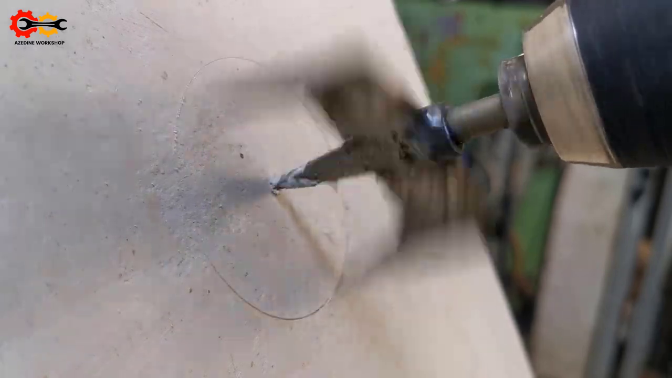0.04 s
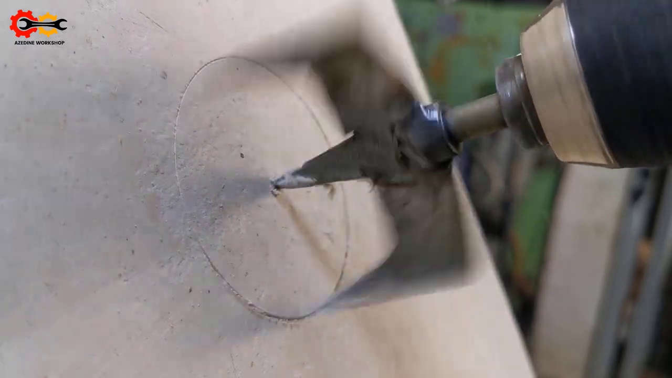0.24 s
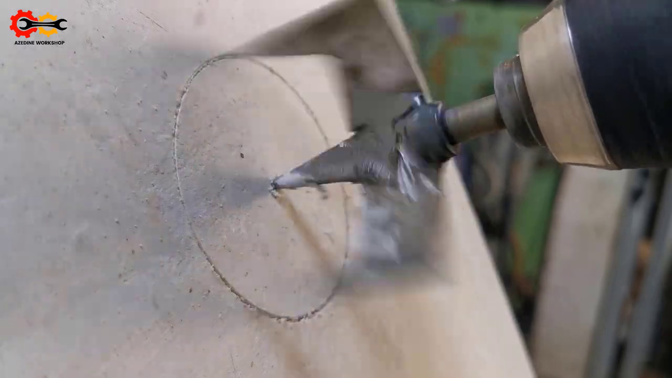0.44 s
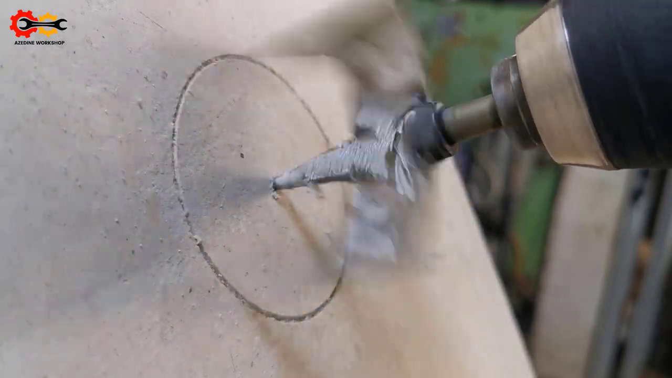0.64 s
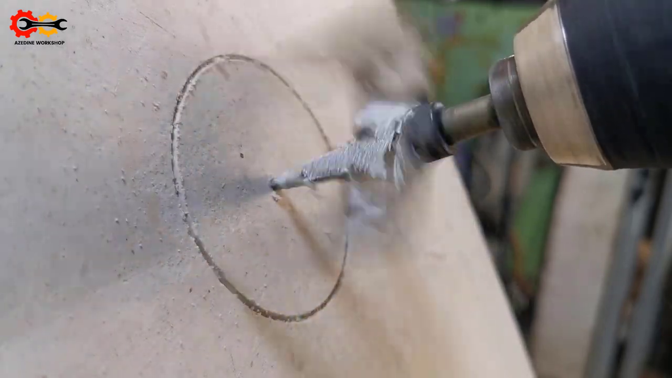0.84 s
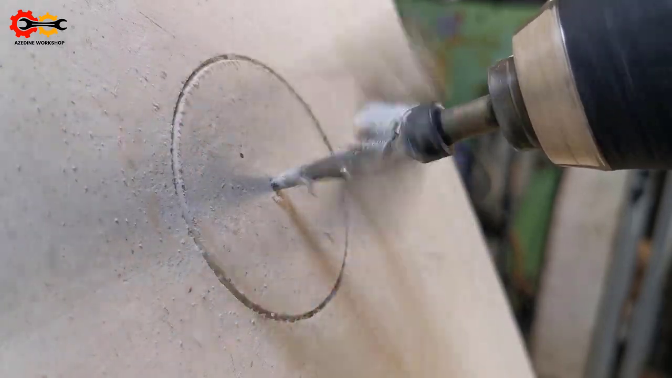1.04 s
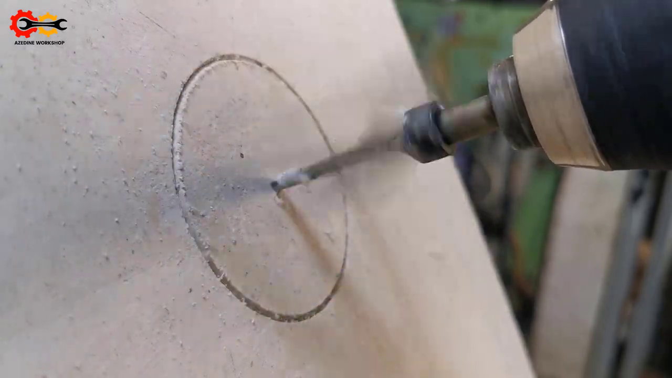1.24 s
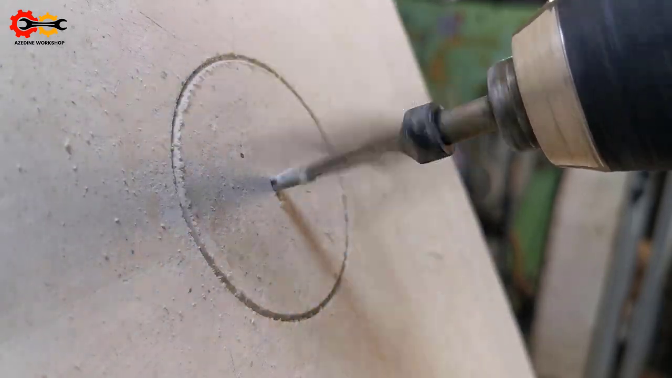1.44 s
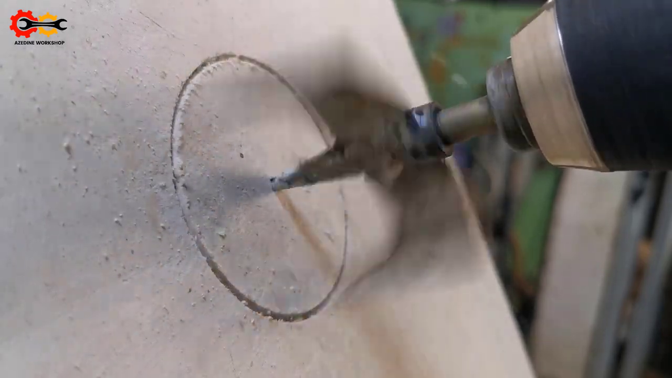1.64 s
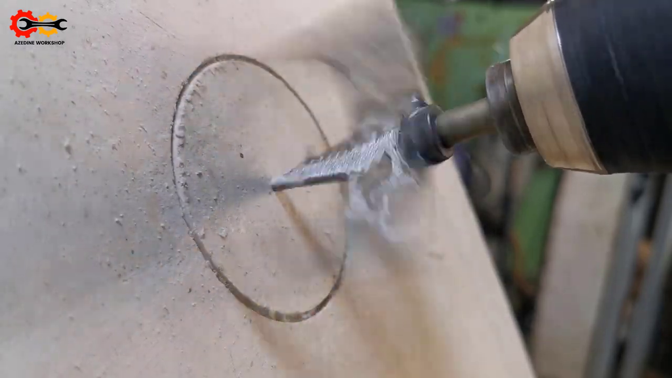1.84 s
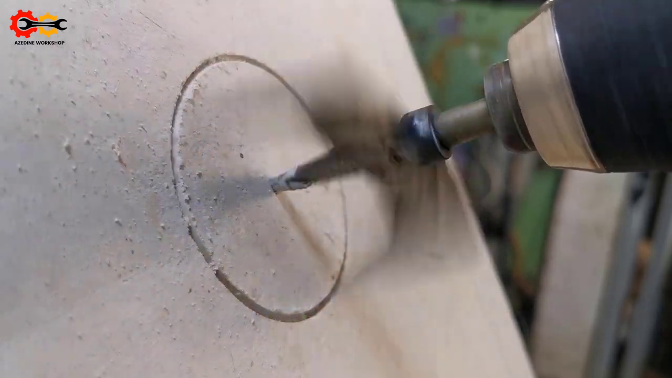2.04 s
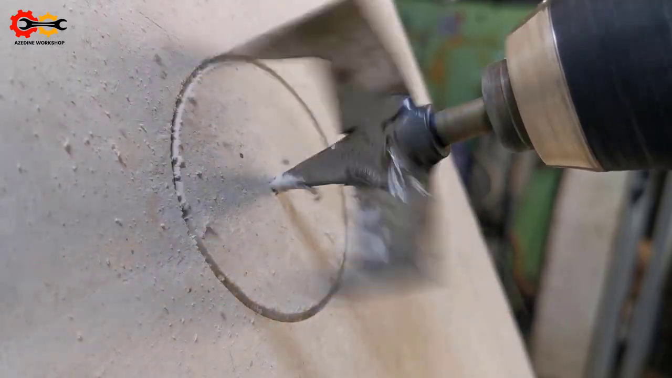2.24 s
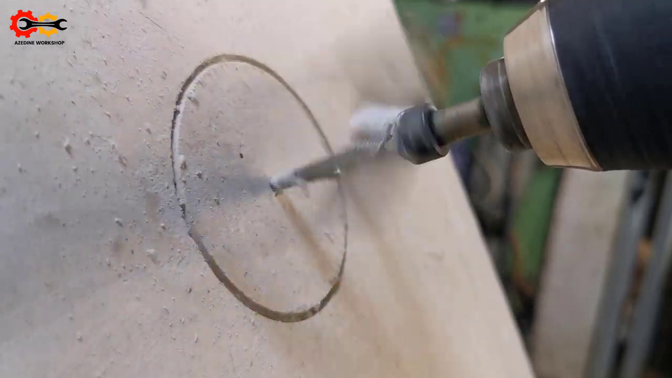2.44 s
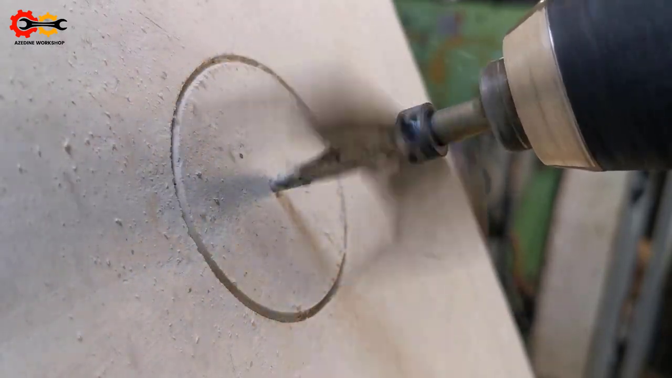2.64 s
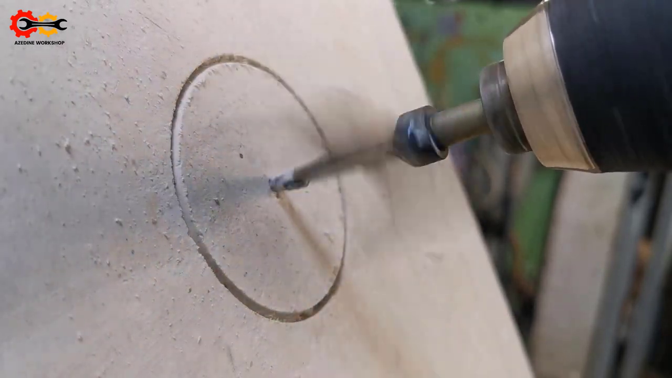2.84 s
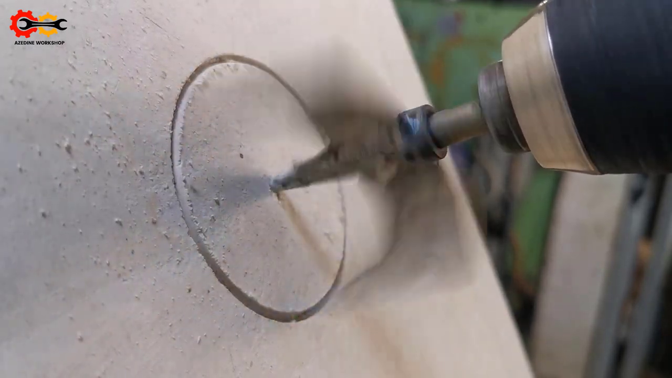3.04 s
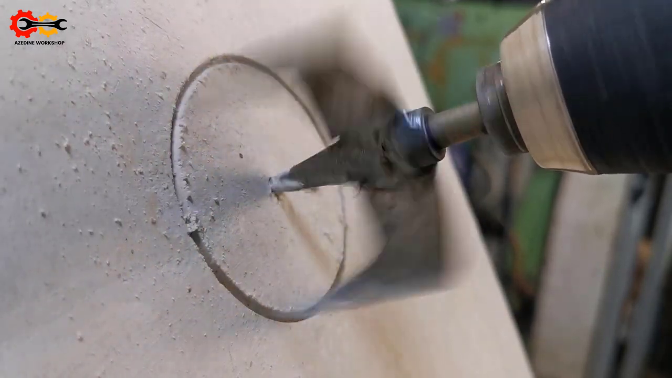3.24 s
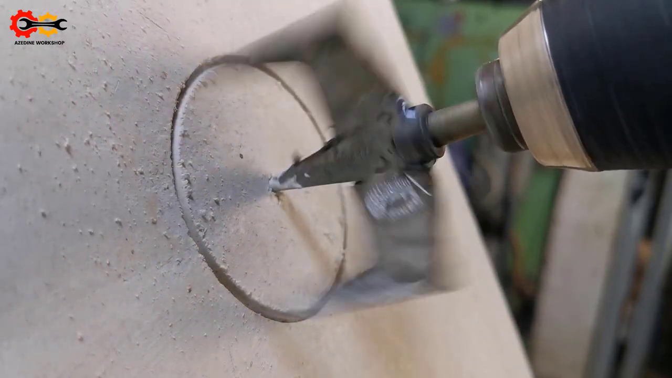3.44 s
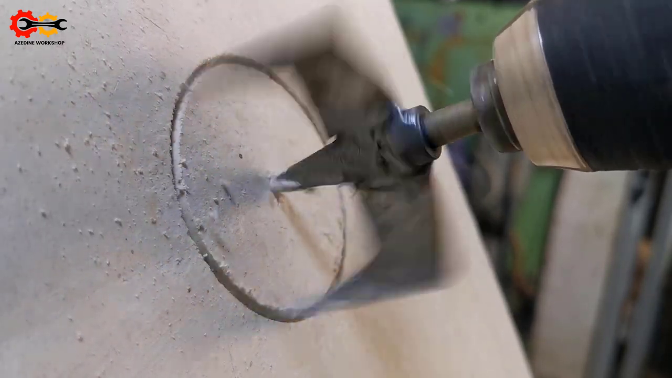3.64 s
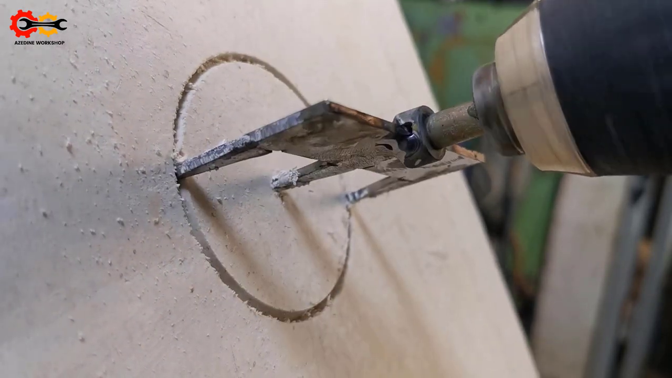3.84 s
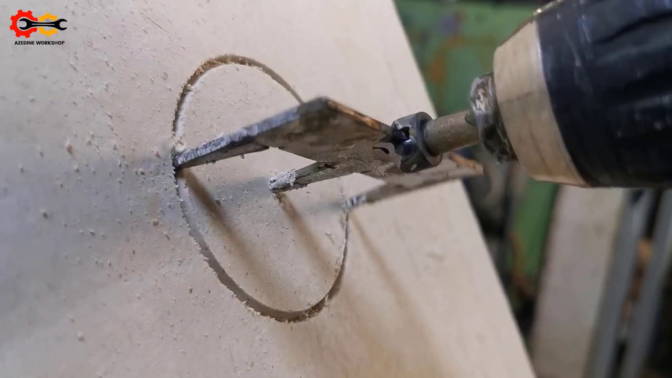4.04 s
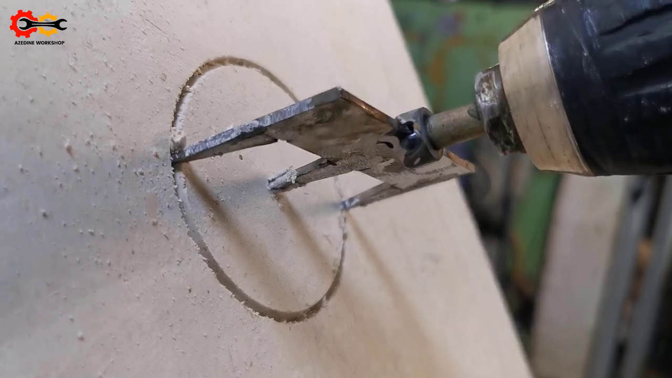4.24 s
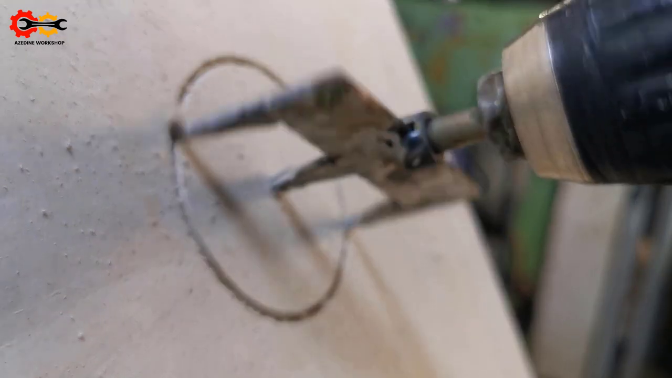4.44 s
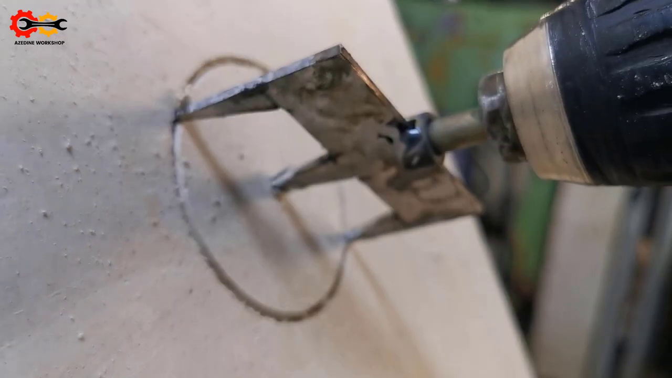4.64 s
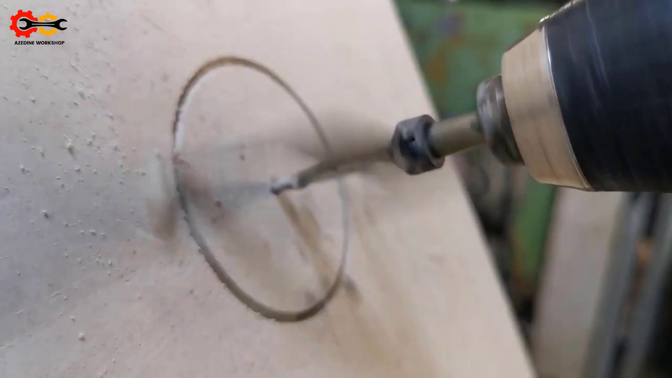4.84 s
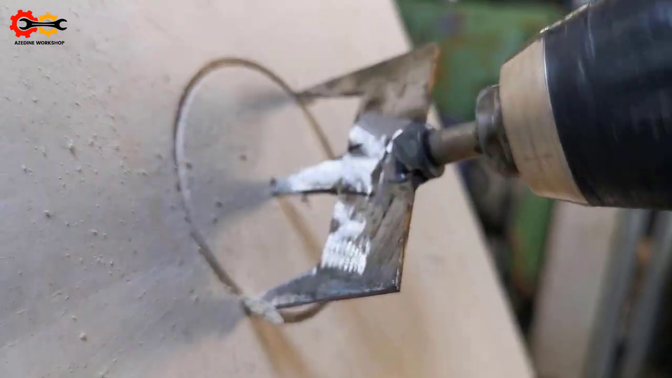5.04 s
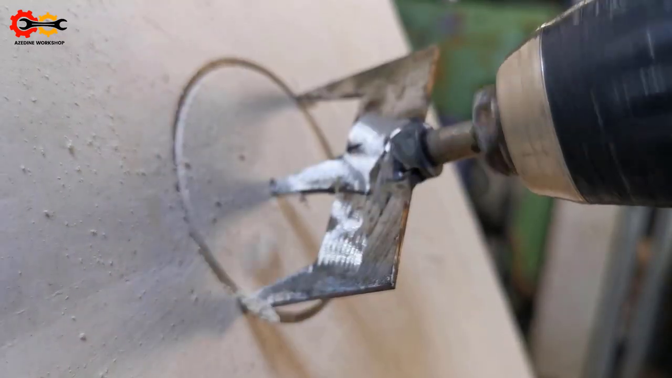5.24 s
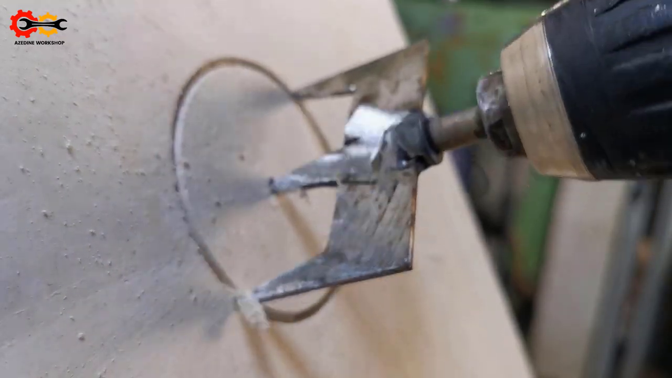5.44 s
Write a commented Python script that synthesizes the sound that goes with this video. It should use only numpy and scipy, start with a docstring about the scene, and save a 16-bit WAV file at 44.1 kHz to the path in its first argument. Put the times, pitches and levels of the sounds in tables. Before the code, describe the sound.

Close by, a whining drill grinds steel blades through a board, slows with a thin squeal, then clacks into one more short burst.

```python
"""A cordless drill turns a two-bladed steel circle cutter in a board, close by on the right,
in a small workshop. The fan whines, the gears rattle and the speed control whistles while the
blades scrape out their groove, for a while snagging about once a turn. As the drill slows, the
steel sticks and slips in the cut and squeals. It stops; then the trigger clacks for one more short run."""
import sys
import numpy as np
from scipy import signal
from scipy.fft import rfft, irfft
from scipy.io import wavfile

SR = 44100
rng = np.random.default_rng(int(sys.argv[2]) if len(sys.argv) > 2 else 0)


def inscribe(sig):
    """Save sig as 16-bit PCM at rate SR to the path in sys.argv[1].

    A 1-D sig is mono; a 2-D sig holds one channel per row.
    Samples are clipped to [-1, 1] before scaling.
    """
    pcm = np.round(np.clip(np.atleast_2d(sig).T, -1, 1) * 32767)
    wavfile.write(sys.argv[1], SR, pcm.astype(np.int16))


N = 242550
T = np.arange(N) / SR
LEFT_LAG_S = 17 / SR  # sound from the right reaches the left ear this much later

# The two runs of the drill. Each row: trigger on and off in seconds, then the base levels in dB
# of the gear rattle, the fan's rush, the motor's whine and the whistle.
RUNS = [(-.42, 4.165, -28.5, -24.5, -29.5, -33.5), (4.595, 5.485, -23.5, -35.5, -33.5, -28)]
# How hard the drill works, one list per run. Each row: time in seconds, load in dB, blade bite in dB.
EFFORT = [
    [(0, -5.5, -31.5), (.06, -7.5, -33), (.095, -2.5, -30.5), (.15, -3.5, -31.5), (.27, -1.5, -31),
     (.75, 0, -32), (1.25, 0, -33), (1.75, 0.5, -31), (2.15, -0.5, -33), (2.72, 0, -34), (2.88, 0.5, -31),
     (3.0, 1, -32), (3.5, 1, -33), (3.862, 2.5, -29.5), (3.882, -0.5, -36), (3.985, -7.5, -42),
     (4.155, -8, -40), (4.2, -24.5, -61)],
    [(4.83, -19, -57.5), (4.865, -4, -41), (4.955, 1.5, -35), (5.02, 0.5, -40), (5.14, 0, -40),
     (5.25, -1.5, -52), (5.32, -5.5, -53), (5.46, -2, -53), (5.5, -7, -55)],
]
# How much weaker the drill is in the left ear. Each row: frequency in Hz, level change in dB.
DRILL_LEFT = [(60, 0), (200, 0), (500, -10.5), (1500, -21), (3000, -14), (5000, -10.5), (8000, -30),
              (13000, -48.5)]


def from_db(db):
    """Turn decibels into a gain to multiply by."""
    return np.exp(np.asarray(db) * (np.log(10) / 20))


def rms_one(x):
    """Scale a signal to an average power of 1."""
    return x / np.sqrt(np.mean(x ** 2) + 1e-20)


def in_time(rows, column=1):
    """Join timed points with straight lines, giving a value at every sample."""
    rows = np.array(rows)
    return np.interp(T, rows[:, 0], rows[:, column])


def at_hz(points, hz):
    """Read a curve of (frequency, value) points at the given frequencies."""
    points = np.array(points)
    return np.interp(np.log(hz + 1e-3), np.log(points[:, 0]), points[:, 1])


def envelope(curves, column=1, fade_s=0.016):
    """Gain from several timed dB curves, each fading out beyond its ends."""
    gain = 0
    for rows in curves:
        outside_s = np.maximum(0, np.maximum(rows[0][0] - T, T - rows[-1][0]))
        gain = gain + from_db(in_time(rows, column)) * np.exp(-outside_s / fade_s)
    return gain


def swells(rows):
    """Bell-shaped rises in gain. Each row: peak time and half length in seconds, level in dB."""
    return sum(from_db(db) * np.exp(-((T - s) / half_s) ** 2) for s, half_s, db in rows)


def held(on_s, off_s, ramp_s=.004):
    """1 while the trigger is pressed, else 0."""
    return np.clip(np.minimum(T - on_s, off_s - T) / ramp_s, 0, 1)


def under_load(db_per_load_db, column):
    """Gain of one part of the drill: its level in each run, rising and falling with the load."""
    return sum(from_db(run[column]) * envelope([rows]) ** db_per_load_db
               for run, rows in zip(RUNS, EFFORT))


def drift(rate_hz):
    """A smooth random wobble of typical size 1; a higher rate wobbles faster."""
    pole = np.exp(-40 * np.pi * rate_hz / SR)
    noise = rng.standard_normal(N // 20 + 2002)  # one value per 20 samples
    slow = signal.lfilter([1], [1, -2 * pole, pole * pole], noise)[2000:]
    return np.interp(np.arange(N) / 20, np.arange(len(slow)), rms_one(slow))


def grit(per_s, spread_db):
    """Tiny impacts of uneven size at random moments."""
    sizes = from_db(spread_db * np.minimum(rng.exponential(1, N), 4))
    return rms_one(sizes * rng.standard_normal(N) * (rng.random(N) < per_s / SR))


def ring(clicks, hz, t60):
    """Each click starts a sine that dies away by 60 dB in t60 seconds."""
    decay, step = from_db(-60 / (t60 * SR)), 2 * np.pi * hz / SR
    return signal.lfilter([0, np.sin(step)], [1, -2 * decay * np.cos(step), decay ** 2], clicks + 1e-18)


def radiate(direct, scatter, colour, peaks=(), left=((1, 0),), lag_s=0):
    """Give a noise its tone colour and send it to both ears; the left also hears unrelated scatter."""
    # How alike the two ears are. Each row: frequency in Hz, likeness from 0 to 1.
    likeness = [(60, 0.79), (200, 1), (500, 0.53), (1500, 0.56), (4000, 0), (9000, 0.14), (15000, 0.3)]
    hz = np.arange(N // 2 + 1) * SR / N
    peaks_db = sum(db * np.exp(-(2 * (hz - centre) / width) ** 2) for centre, width, db in peaks)
    gain = rms_one(from_db(at_hz(colour, hz) + peaks_db))
    alike = np.clip(at_hz(likeness, hz), 0, 1)
    right = rfft(direct)
    delayed = right * np.exp(-2j * np.pi * hz * lag_s)
    blend = alike * delayed + np.sqrt(1 - alike ** 2) * rfft(scatter)
    return irfft(gain * np.array([blend * from_db(at_hz(left, hz)), right]), N)


def tone(hz, gain, left_db, flutter_db, lag_s=LEFT_LAG_S):
    """A sine that reaches the left ear later; the turning blades reflect it, so it flutters."""
    phase = 2 * np.pi * np.cumsum(np.broadcast_to(hz, N)) / SR
    ears = np.array([from_db(left_db) * np.sin(phase - 2 * np.pi * hz * lag_s), np.sin(phase)])
    flutter = from_db(flutter_db * np.array([drift(22), drift(23)]))
    return np.sqrt(2) * gain * ears * flutter


def motor_whine(speed, surge, wander=0.00448, judder=0.00698, build_s=0.54, start_db=-32):
    """The rotor and its nine fan blades make tones that follow the juddering shaft."""
    # The motor's tones. Each row: multiple of the turning rate, relative level in dB.
    motor_tones = [(5, -13), (9, 1.06), (18, -16.5), (27, -25.5)]
    # The whine grows with speed. Each row: turns per second, level change in dB.
    whine_by_speed = [(60, -31), (100, -20), (124, -19), (134, -7.5), (145, -3.5), (158, -.5), (172, 1),
                      (200, 5.5), (225, -2.5)]
    # How well the tones pass the vents, and then how well they reach the left ear.
    # Each row: frequency in Hz, level change in dB.
    vents = [(580, -12), (700, 9), (790, 4), (850, 6), (1000, -3), (1250, 5), (1450, 0.5), (1800, 0.5),
             (2900, 4), (3600, 3.5), (4400, 6)]
    vents_left = [(800, -17), (1500, -27), (1800, -26), (2900, -7), (4400, 2.5)]
    running, out = 0, 0
    for (on, off, _, _, whine_db, _), effort in zip(RUNS, EFFORT):
        build_db = np.interp(T - on, [0, build_s], [start_db, 0])
        running = running + held(on, off) * from_db(whine_db + build_db + 0.5 * in_time(effort))
    gain = running * surge * from_db(at_hz(whine_by_speed, speed) + 1.22 * drift(120))
    unsteady_speed = speed * (1 + wander * drift(23) + judder * drift(130))
    for multiple, db in motor_tones:
        hz = multiple * unsteady_speed
        waver_db = np.clip(.2 * db, -3, 3) * drift(45)  # weak tones waver most
        level = gain * from_db(db + waver_db + at_hz(vents, hz))
        out = out + tone(hz, level, at_hz(vents_left, hz), flutter_db=1.0)
    return out


def gear_rattle(angle, gain, throb=0.096):
    """Gear teeth rattle in the housing, throbbing once per turn of the motor."""
    # The rattle's tone colour. Each row: frequency in Hz, relative level in dB.
    colour = [(45, -46), (100, -21), (160, -6.5), (320, -8), (500, 0.5), (1100, -0.5), (2000, -2),
              (3500, -7), (4500, -4.5), (6000, -9), (8000, -18), (10000, -11), (13000, -17), (15800, -18.5)]
    # Where the housing rings. Each row: frequency in Hz, width in Hz, boost in dB.
    peaks = [(413, 290, 2.1), (680, 240, 0.95), (905, 110, 3.3), (2640, 190, 6.2), (5140, 870, 1.52),
             (6780, 320, 9.4), (8850, 1000, 7.2)]
    teeth = gain * (1 + throb * np.cos(angle)) * from_db(1.54 * drift(27))
    direct, scatter = teeth * grit(9000, 1.0), teeth * grit(9000, 0.84)
    return from_db(-3.5) * radiate(direct, scatter, colour, peaks, DRILL_LEFT, LEFT_LAG_S)


def fan_rush(angle, gain, chop=0.25):
    """The fan's nine blades chop the air they throw out."""
    # The air's tone colour. Each row: frequency in Hz, relative level in dB.
    colour = [(45, -37), (150, -32.5), (400, -11), (800, -8.5), (1200, -10), (2000, -1), (3300, -4),
              (4400, -6), (6000, -14.5), (8000, -17.5), (10000, -14.5), (12500, -11), (13700, -16),
              (15800, -17.5)]
    # Its resonances. Each row: frequency in Hz, width in Hz, boost in dB.
    peaks = [(2387, 290, 3.3), (3000, 74, 0.75), (5120, 780, 9.8), (6580, 320, 10.9), (10840, 630, 8.7),
             (11700, 578, 6.5), (14500, 471, 4.3)]
    air = gain * (1 + chop * np.cos(9 * angle)) * rng.standard_normal((2, N))
    return from_db(-.5) * radiate(*air, colour, peaks, DRILL_LEFT, LEFT_LAG_S)


def speed_control(speed, surge, switch_hz=4883.4, idle_load_db=-5):
    """Power switched rapidly on and off makes the motor's coils whistle, louder under load."""
    # The whistle's tones. Each row: multiple of the switching rate, relative dB at rest and turning.
    harmonics = [(1, 0, 0), (2, -13, -23), (3, -29, -38)]
    # The whistle in each run. Each row: left ear change in dB, flutter in dB.
    manner = [(-13.5, 2.5), (-31, 1.3)]
    # Extra current as the shaft starts to move.
    # Each row: peak time and half length in seconds, size in dB compared with the steady current.
    inrush = [(4.844, 0.011, 1)]
    turning = np.clip(speed / 60, 0, 1)  # 0 at rest, 1 from 60 turns per second up
    out = 0
    for (on, off, *_, whistle_db), effort, (left_db, flutter_db) in zip(RUNS, EFFORT, manner):
        load_db = np.maximum(in_time(effort), idle_load_db)
        current = held(on, off) * surge * (1 + swells(inrush)) * from_db(whistle_db + load_db)
        for multiple, rest_db, turning_db in harmonics:
            gain = current * from_db(rest_db + turning * (turning_db - rest_db))
            out = out + tone(multiple * switch_hz, gain, left_db, flutter_db * turning)
    return out


def blade_scrape(surge):
    """The steel tips tear off crumbs in clumps, and the board passes the sound to the air."""
    # The scrape's tone colour. Each row: frequency in Hz, relative level in dB.
    colour = [(45, -12), (85, -16), (140, -5.5), (330, -8.5), (750, -16.5), (1600, -6), (2500, -6),
              (4000, -12.5), (6000, -4.5), (8800, -7), (10000, -12.5), (12000, -27.5), (14000, -14),
              (15800, -32)]
    # Where the board rings. Each row: frequency in Hz, width in Hz, boost in dB.
    peaks = [(148, 28, 1.6), (440, 140, 3.9), (615, 44, 15.5), (970, 540, 12.5), (1290, 144, 1.7),
             (3187, 630, 11.8), (11520, 3440, 8.1), (12660, 1106, 8.0), (15600, 1250, 6)]
    bite = envelope(EFFORT, column=2) * surge * from_db(1.68 * drift(37))
    scrape = radiate(bite * grit(14000, 1.2), bite * grit(14000, 1.3), colour, peaks, lag_s=LEFT_LAG_S)
    return scrape * from_db([[-.3], [-2.5]])  # left ear, right ear


def steel_ring(shake):
    """The tips catch and let go in bursts of chatter, which keep the cutter and chuck ringing."""
    # The steel's notes. Each row: pitch in Hz, ring time in seconds, relative dB, left ear change in dB.
    notes = [(2304, 0.02, -21.5, -8), (2440, 0.032, -20.5, -13), (2550, 0.038, -23.5, -8.5),
             (2940, 0.039, -26.5, -6.5), (3066, 0.029, -24, -13), (5460, 0.028, -25.5, -11.5)]
    chatter, out = drift(16.4), 0
    for hz, t60, db, left_db in notes:
        bursts = from_db(8 * np.minimum(.6 * chatter + .8 * drift(14), 1.4))
        right = shake * from_db(db) * rms_one(ring(bursts * grit(500, 0.62), hz, t60))
        left = from_db(left_db) * np.interp(T - LEFT_LAG_S, T, right)
        out = out + np.array([left, right])
    return out


def handling_rumble(steady_db=-66):
    """The handled board and tool give soft bumps over a steady rumble."""
    # The bumps. Each row: peak time in seconds, half length in seconds, relative level in dB.
    bumps = [(.06, 0.21, -48), (.49, 0.031, -43), (1.02, .05, -50), (1.54, 0.053, -53), (3.07, 0.073, -47),
             (3.23, .07, -46), (3.8, .06, -54.5), (4.31, 0.08, -44.5), (4.66, 0.16, -43.5),
             (5.04, 0.14, -41.5)]
    # The rumble's tone colour. Each row: frequency in Hz, relative level in dB.
    colour = [(10, -21), (22, -3.5), (45, -2.5), (75, -4.5), (110, -2), (170, -7), (400, -31),
              (2000, -88.5)]
    rumble = radiate(*rng.standard_normal((2, N)), colour)
    return (from_db(steady_db) + swells(bumps)) * rumble * from_db([[-7], [-5]])


def room_noise(level_db=-61):
    """The workshop's faint, low background noise."""
    # Its tone colour. Each row: frequency in Hz, relative level in dB.
    colour = [(12, -41.5), (20, -1), (103, -11), (132, -3), (160, -36), (319, -10), (656, -19), (2340, -25),
              (7510, -36.5), (10800, -33), (15000, -85)]
    return from_db(level_db) * radiate(*rng.standard_normal((2, N)), colour)


def workshop_echo(sound, low_t60_s=0.24, treble_t60_s=0.22, split_hz=5000):
    """A wash of echoes, unrelated in each ear, with the treble dying first."""
    t = T[:SR // 2]
    noise = rng.standard_normal((2, len(t)))
    low = signal.sosfilt(signal.butter(2, split_hz, fs=SR, output="sos"), noise)
    tail = low * from_db(-60 * t / low_t60_s) + (noise - low) * from_db(-60 * t / treble_t60_s)
    tail *= t > .005  # the first echo takes 5 ms
    tail /= np.sqrt(np.sum(tail ** 2, axis=1, keepdims=True))
    return signal.fftconvolve(sound.mean(axis=0, keepdims=True), tail, axes=1)[:, :N]


def snags(drag_s=.11, free_s=.04, surge_s=0.057, slip_s=0.0096, settle_s=0.06):
    """A blade snags and drags the motor down, breaks free, cuts in a surge, slips out and settles."""
    # About one snag per turn of the cutter.
    # Each row: time in seconds, motor turns per second lost, level change in dB in the surge and slip.
    catches = [(1.4, 3.35, 0.5, 2), (1.627, 7, 1, 0), (1.822, 6, -0.5, -3.5), (1.997, 8.6, 0.5, -1),
               (2.176, 6.4, 2, 0.5), (2.362, 7.2, 2, -3.5), (2.548, 7, 1, -5.5), (2.732, 7.6, 0, -2),
               (3.035, 10, 0.5, 1.5), (3.192, 2.96, 2, -2), (3.376, 6, .5, -1.5), (3.529, 3.99, 0, 0),
               (3.689, 5.74, 0.5, -1)]
    lost_speed, swing_db = 0, 0
    for s, lost, surge_db, slip_db in catches:
        lost_speed = lost_speed + np.interp(T, [s - drag_s, s, s + free_s], [0, lost, 0])
        stages = s + np.cumsum([0, free_s, surge_s, slip_s, settle_s])
        swing_db = swing_db + np.interp(T, stages, [0, surge_db, surge_db, slip_db, 0])
    return lost_speed, from_db(swing_db)


def squeal(angle, judder=0.021):
    """At low speed the steel sticks and slips on one high note; a loose grip makes it rasp."""
    # Two squeals, one list each. Each row: time in seconds, pitch in Hz, relative level in dB.
    curves = [
        [(3.927, 12590, -33), (3.939, 12490, -14), (3.975, 12415, -19), (4.065, 12465, -13),
         (4.1, 12410, -13.5), (4.15, 12520, -8.5), (4.183, 12270, -19), (4.195, 11980, -33)],
        [(5.254, 12390, -40), (5.26, 12420, -22), (5.285, 12435, -23), (5.32, 12350, -27), (5.45, 12320, -24),
         (5.462, 12455, -16.5), (5.495, 12370, -29)],
    ]
    # One row per squeal: gain in dB, left ear change in dB, left ear delay in seconds, rasp in dB.
    manner = [(.5, -8.5, 0.0003875, 0.3), (0.5, -1, .00036, 1.5)]
    throb = 1 + judder * np.cos(9 * angle)  # the motor's judder adds side tones
    out = 0
    for rows, (gain_db, left_db, lag_s, rasp_db) in zip(curves, manner):
        grip = from_db(gain_db + rasp_db * (drift(700) + drift(50)))
        both_ears = np.hypot(1, from_db(left_db))
        gain = envelope([rows], column=2, fade_s=.002) * grip * throb / both_ears
        hz = in_time(rows) + 18 * rasp_db * drift(270)
        out = out + tone(hz, gain, left_db, flutter_db=2.8, lag_s=lag_s)
    return out


def knocks():
    """The trigger, slack gears and blade tips knock: each hit is a short crack and a thump."""
    # The hits. Each row: start in seconds, crack in dB, its fade time in seconds, thump strength in dB.
    hits = [(4.195, -45, .03, -53), (4.233, -41.5, .03, -61), (4.243, -48, .02, -64.5),
            (4.268, -39, 0.051, -69), (4.277, -27.5, 0.035, -55), (4.323, -42, .035, -60),
            (4.3, -44.5, 0.11, -64), (4.590, -42, 0.0295, -62), (4.594, -24, 0.027, -43),
            (4.597, -15, 0.026, -38.5), (4.602, -26, 0.011, -33), (4.608, -30.5, 0.068, -42),
            (4.626, -37, .015, -45), (4.86, -22, 0.013, -51), (4.879, -43, 0.031, -59),
            (5.248, -23, 0.044, -43)]
    # Notes of the knocked drill, steel and board. Each row: pitch in Hz, gain in dB, seconds of ring.
    body_notes = [(106, -21, 0.18), (161, -0.5, 0.12), (340, -11, .05), (555, 9.5, 0.042),
                  (794, 1.5, 0.039), (2040, -5, 0.035), (4700, 5, 0.032)]
    # The crack's tone colour. Each row: frequency in Hz, relative level in dB.
    colour = [(88, -51), (150, -25.5), (618, -6), (1290, -8.5), (2860, -7), (4390, -13.5), (5030, -8),
              (8010, -23), (10300, -8.5), (15500, -26)]
    crack_gain, blows = np.zeros(N), np.zeros(N)
    for s, db, t60, thump_db in hits:
        crack_gain += (T >= s) * from_db(db - 60 * np.maximum(T - s, 0) / t60)
        blows[round(s * SR)] = from_db(thump_db)
    thump = sum(from_db(db) * ring(blows, hz, t60) for hz, db, t60 in body_notes)
    noise = crack_gain * rng.standard_normal((2, N))
    return radiate(*noise, colour, left=DRILL_LEFT, lag_s=LEFT_LAG_S) + thump * from_db([[-5], [0]])


def squeaks(pitch_hz=5400, waver_hz=30):
    """A blade tip briefly grips and sounds a faint note, lower than the squeal."""
    # The squeaks. Each row: peak time in seconds, length in seconds, level in dB.
    grips = [(4.88, 0.068, -44), (5.22, .08, -39), (5.385, 0.17, -45)]
    gain = swells([(s, length / 2, db) for s, length, db in grips])
    return tone(pitch_hz + waver_hz * drift(302), gain, left_db=-13, flutter_db=5.5)


def scene():
    """Speed and load drive the drill and the cutter; snags make both surge."""
    # Motor speed without snags, one list per run. Each row: time in seconds, turns per second.
    run_speeds = [
        [(0, 144), (.07, 142), (.18, 123), (.27, 161), (.36, 167), (.8, 158.5), (1.66, 161), (1.73, 172),
         (1.87, 178.5), (2.45, 171.5), (2.81, 170), (2.96, 203), (3.09, 206), (3.75, 197), (3.83, 180),
         (3.9, 134), (4.115, 132), (4.15, 154), (4.25, 0)],
        [(4.815, 0), (4.89, 169), (4.96, 227), (5.06, 200), (5.15, 143), (5.3, 67), (5.45, 67), (5.5, 38)],
    ]
    lost_speed, surge = snags()
    speed = in_time(run_speeds[0] + run_speeds[1]) - lost_speed
    angle = 2 * np.pi * np.cumsum(speed) / SR  # how far the motor has turned
    gear_gain = surge * under_load(1.8, column=2)
    fan_gain = surge * under_load(0.83, column=3)
    drill = motor_whine(speed, surge) + gear_rattle(angle, gear_gain) + fan_rush(angle, fan_gain)
    drill += speed_control(speed, surge) + knocks()
    shake = from_db(-1.5) * gear_gain + from_db(2.5) * fan_gain  # gears and motor shake the steel
    cutter = blade_scrape(surge) + steel_ring(shake) + squeal(angle) + squeaks()
    tool = drill + cutter
    return tool + handling_rumble() + room_noise() + from_db(-15.5) * workshop_echo(tool)


def record(dry, cutoff_hz=15700):
    """A steep filter cuts off the highest treble."""
    return signal.sosfilt(signal.ellip(12, .1, 80, cutoff_hz, fs=SR, output="sos"), dry)


dry = scene()
out = record(dry)
inscribe(out)
```